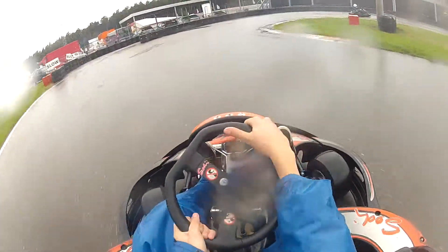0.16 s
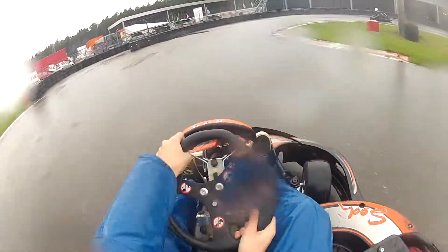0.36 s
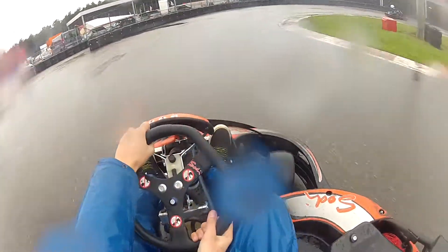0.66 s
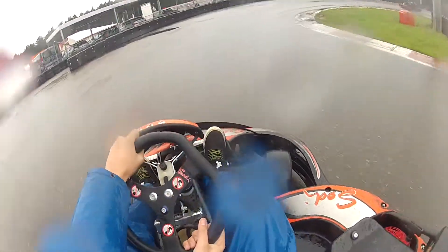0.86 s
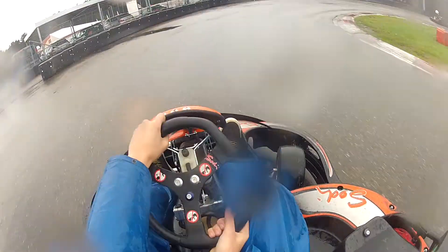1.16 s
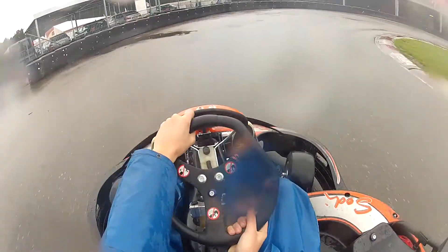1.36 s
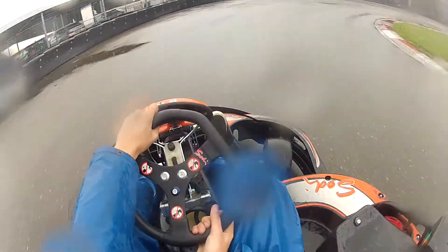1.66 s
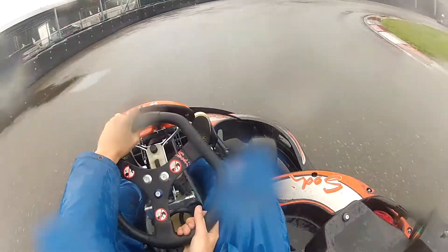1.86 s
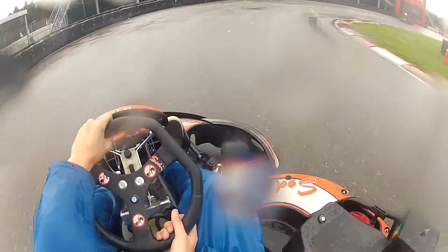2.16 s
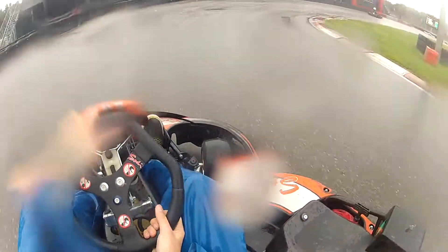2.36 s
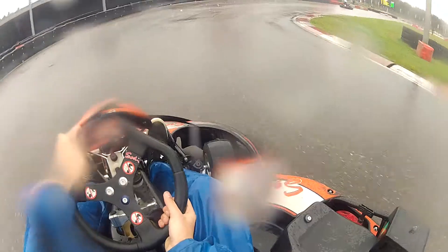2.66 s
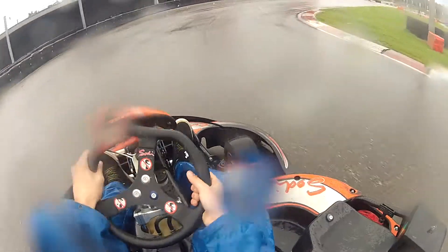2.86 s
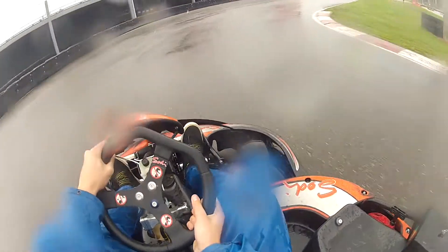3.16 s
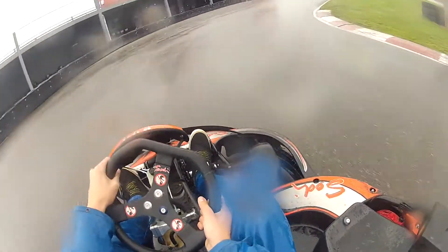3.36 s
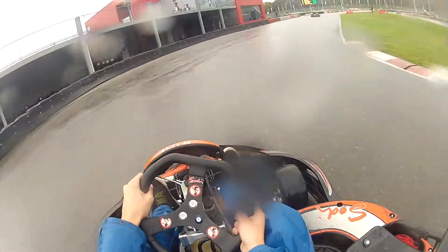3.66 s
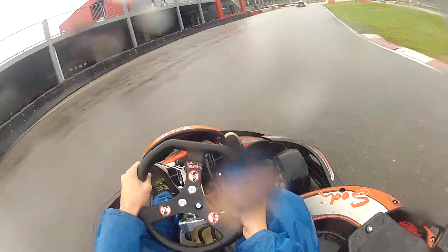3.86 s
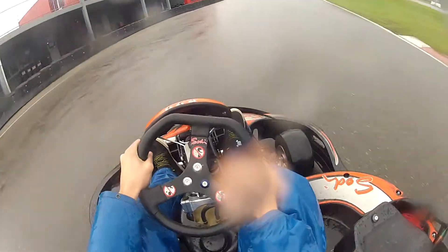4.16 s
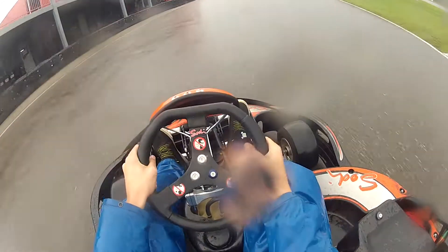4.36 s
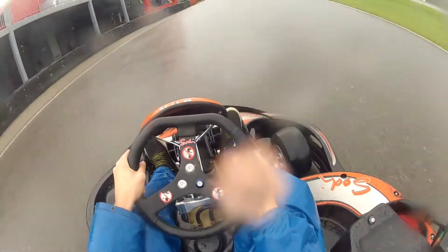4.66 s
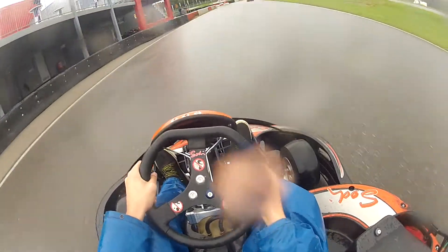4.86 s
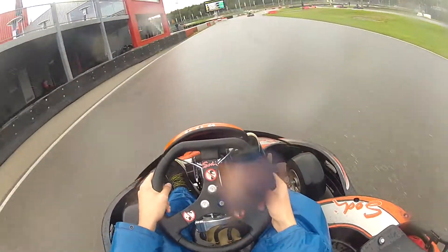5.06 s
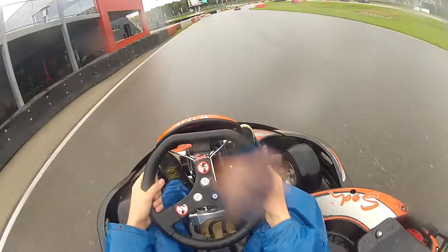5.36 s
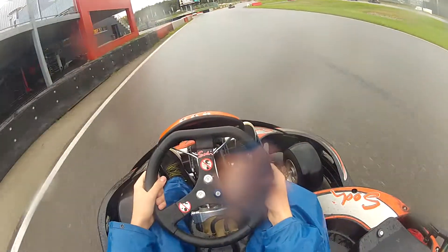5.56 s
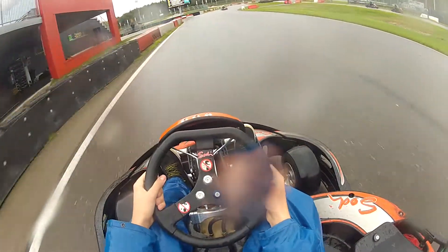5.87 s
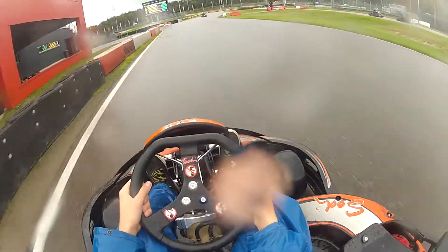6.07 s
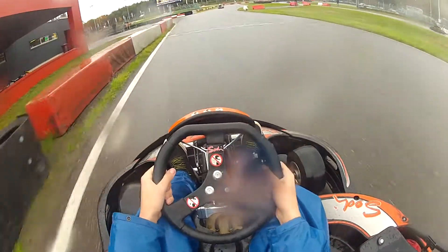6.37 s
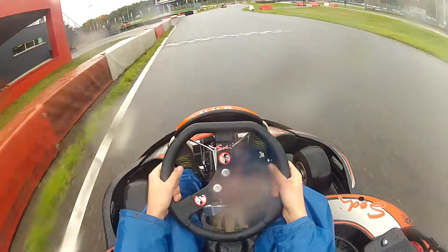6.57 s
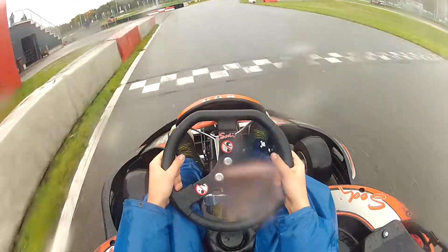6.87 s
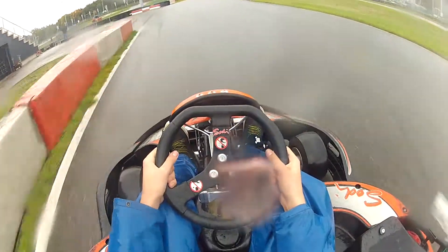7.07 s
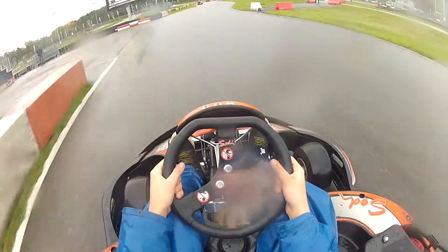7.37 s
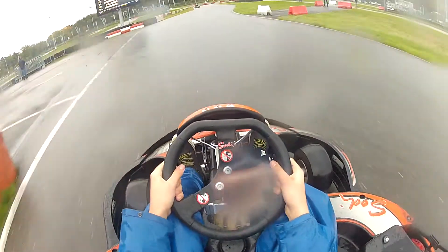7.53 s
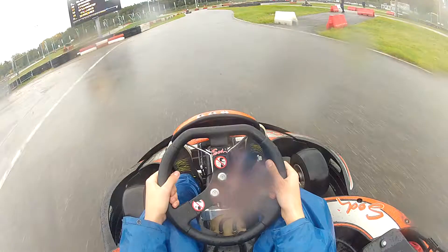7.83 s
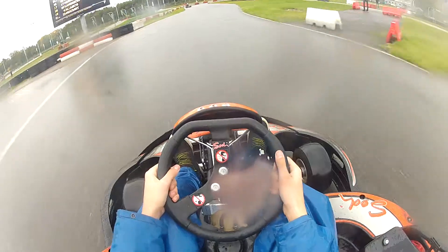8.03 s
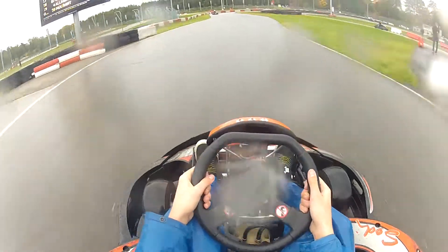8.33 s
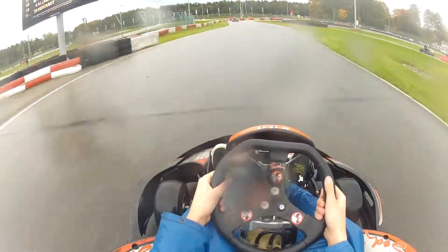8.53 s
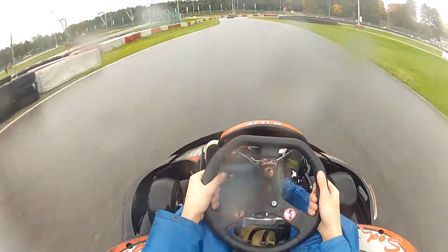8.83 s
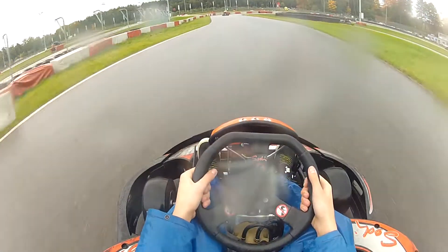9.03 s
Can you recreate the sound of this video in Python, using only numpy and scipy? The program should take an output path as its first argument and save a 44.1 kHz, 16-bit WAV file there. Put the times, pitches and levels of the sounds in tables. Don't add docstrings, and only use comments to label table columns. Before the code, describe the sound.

Heard from a sealed camera on the driver's helmet, a small four-stroke kart engine growls briefly, falls to a slow idle in a corner, then revs back into a buzzy, steady drone. Metallic clutch clinks tick through the pickup. Later the pitch climbs with a thin chain whine, tyres hiss faintly on the wet track, and bumps knock the housing hard.

```python
import sys
import numpy as np
from scipy import signal
from scipy.fft import rfft, irfft, next_fast_len
from scipy.io import wavfile
from scipy.ndimage import uniform_filter1d

SR = 44100
rng = np.random.default_rng(int(sys.argv[2]) if len(sys.argv) > 2 else 0)


def store_pcm(level_fs):
    pcm = np.round(np.clip(level_fs, -1, 1) * 32767).astype(np.int16)
    wavfile.write(sys.argv[1], SR, np.atleast_2d(pcm).T)


def voltage_ratio(decibels):
    exponent = np.asarray(decibels, float) / 20
    return 10 ** exponent


N = 405719


def rms_one(x):
    return x / np.sqrt(np.mean(x ** 2) + 1e-20)


def in_time(rows):
    s, *columns = np.transpose(rows)
    return [np.interp(np.arange(N) / SR, s, c) for c in columns]


def at_hz(points, hz):
    point_hz, value = np.transpose(points)
    return np.interp(np.log(hz), np.log(point_hz), value)


def drift(rate_hz):
    r = np.exp(-80 * np.pi * rate_hz / SR)
    slow = signal.lfilter([1], [1, -2 * r, r * r], rng.standard_normal(N // 40 + 2002))[2000:]
    return np.interp(np.arange(N) / 40, np.arange(len(slow)), rms_one(slow))


def coloured(spectrum):
    size = next_fast_len(N)
    hz = np.maximum(np.fft.rfftfreq(size, 1 / SR), 1)
    white = rfft(rng.standard_normal(size))
    return rms_one(irfft(white * voltage_ratio(at_hz(spectrum, hz)), size)[:N])


def resonance(x, hz, width_hz):
    r = np.exp(-np.pi * width_hz / SR)
    poles = [1, -2 * r * np.cos(2 * np.pi * hz / SR), r * r]
    return signal.lfilter([(1 - r * r) / 2, 0, (r * r - 1) / 2], poles, x)


def struck(times_s, peaks_db, hz, level_db, t60_s):
    clicks = np.full(N, 1e-18)
    clicks[(np.asarray(times_s) * SR).astype(int)] = voltage_ratio(peaks_db + level_db)
    r, w = voltage_ratio(-60 / (t60_s * SR)), 2 * np.pi * hz / SR
    return signal.lfilter([0, np.sin(w)], [1, -2 * r * np.cos(w), r * r], clicks)


def crack(times_s, peaks_db, t60_s):
    touch = np.full(N, 1e-18)
    touch[(times_s * SR).astype(int)] = voltage_ratio(peaks_db)
    envelope = signal.lfilter([1], [1, -voltage_ratio(-60 / (t60_s * SR))], touch)
    return envelope * coloured([(700, -40), (1300, 9), (3700, 21.5), (5900, -78), (7000, -68)])


def per_cycle(cycles, spread_db):
    return voltage_ratio(spread_db * rng.standard_normal(400)[cycles.astype(int)])


def follow(law, controls_db):
    return law[0] + sum(share * c for share, c in zip(law[1:], controls_db))


def exhaust_note(rate_hz, cycles, note_db):
    # multiple of firing rate, level/dB
    orders = [(1, -24), (2, -19), (3, -0.5), (4, -40), (5, -15.5), (6, -7), (7, -8.5), (8, -20), (9, -6),
              (10, -24), (11, -3.5), (12, -25), (13, -10), (14, -0.5), (15, -6), (16, -1.5), (17, 0.5),
              (18, -5), (19, -4), (20, 0.5), (21, -15), (22, -2), (23, -17), (24, -3.5), (25, -2),
              (26, -3.5), (27, -6.5), (28, -42), (29, -25), (30, -21)]
    # f/Hz, gain/dB
    silencer = [(25, -2), (60, 2.5), (100, 0.5), (200, -0.5), (300, 3.5), (400, -3.5), (485, -9.5),
                (555, -1), (620, -11), (690, -15), (800, -9.5), (950, -13)]
    # centre t/s, length/s, gain/dB
    slack_s, slack_length_s, slack_depth_db = (5.44, .42, -18)
    step = 8
    t = np.arange(0, N, step) / SR
    slack_db = slack_depth_db * np.exp(-((t - slack_s) / slack_length_s) ** 4)
    out = 0
    for order, level_db in orders:
        wander_db = 0.56 * drift(2.8)[::step] + slack_db * (order < 5)
        phase = 2 * np.pi * order * cycles[::step] + np.pi / 2 * (order % 2)
        phase = phase + .5 * rng.standard_normal() + 0.39 * drift(1.6)[::step]
        colour_db = at_hz(silencer, order * rate_hz[::step])
        out += voltage_ratio(level_db + colour_db + wander_db) * np.cos(phase)
    return -voltage_ratio(note_db + 5.0) * rms_one(signal.resample_poly(out, step, 1)[:N])


def rough_exhaust(cycles, rough_db):
    # f/Hz, density/dB per Hz
    spectrum = [(53, -31), (90, 10.5), (113, -14), (306, 2.5), (371, -15), (405, -2.5), (610, -7),
                (825, -22), (900, -29), (1170, -23), (1980, -120)]
    puff = .5 + np.exp(-3.0 * (2 * cycles % 1))
    return voltage_ratio(rough_db) * rms_one(coloured(spectrum) * puff * per_cycle(2 * cycles % 400, 1.05))


def pops(cycles, pop_db):
    # f/Hz, level/dB, t60/s
    port = [(315, 0, .024), (520, -6, .01)]
    at = np.flatnonzero(np.diff(np.floor(2 * cycles)))
    weak = np.floor(2 * cycles[at + 1]) % 2 == 0
    strength_db = pop_db[at] + 3 - 6.0 * weak + .8 * rng.standard_normal(800)[:len(at)]
    return -sum(struck(at / SR, strength_db, *mode) for mode in port)


def mechanical_hiss(cycles, hiss_db, steady):
    # f/Hz, density/dB per Hz
    spectrum = [(380, -36), (650, -9), (812, -13), (924, -5.5), (1640, -8.5), (2070, -2), (3030, -14),
                (3710, -12), (5470, -20.5), (5950, -25.5), (7740, -49), (13100, -120)]
    # f/Hz, width/Hz, level over hiss/dB
    housing = [(1017, 125, 6), (1342, 67, 2.5), (1777, 29, 8.5), (2037, 88, 5), (2457, 255, 5.5),
               (2650, 50, -15), (3610, 110, 9), (5320, 150, 5)]
    burst = np.exp(-3 * ((cycles + .05) % 1)) + .3 * np.exp(-5 * ((cycles + .55) % 1))
    burst = uniform_filter1d(burst * per_cycle(cycles + 0.062, 0.15), size=240)
    noise = coloured(spectrum) * (steady + burst) * voltage_ratio(.8 * drift(90.0))
    rattle = coloured(spectrum) * (steady / 5 + burst) * voltage_ratio(drift(90.0))
    rings = sum(voltage_ratio(db + 2.4 * drift(18.5)) * resonance(rattle, hz, width) for hz, width, db in housing)
    return voltage_ratio(hiss_db) * rms_one(0.9 * noise + rings)


def spray(cycles):
    # f/Hz, density/dB per Hz
    spectrum = [(1470, -35), (2500, 2), (2910, -43), (3190, -13), (3330, 4.5), (3770, 4), (3950, -9),
                (5900, -14), (7670, -56), (13000, -120)]
    level_db = -50.5
    stir = 1 + 0.2 * np.cos(4 * np.pi * cycles)
    return voltage_ratio(level_db) * coloured(spectrum) * stir * voltage_ratio(1.0 * drift(21.0))


def chain(cycles, tooth_hz, road_db, locked):
    # f/Hz, width/Hz, level/dB
    guard = [(610, 84, -34), (800, 310, -45), (1070, 53, -23.5), (1510, 71, -29), (1730, 75, -36.5)]
    growth_per_db, lock_gain_db = 2.8, 7
    overtone_db, half_tooth_db = -7, -48

    def swell(multiple):
        return sum(voltage_ratio(db) / (1 + (2 * (multiple * tooth_hz - hz) / width) ** 2) for hz, width, db in guard)

    phase = 2 * np.pi * np.cumsum(tooth_hz) / SR + .3 * drift(5)
    tug = np.sqrt(2) * (1 + 0.71 * np.cos(2 * np.pi * cycles))
    whine_flutter_db, overtone_flutter_db = 1.5 * drift(4), 2.5 * drift(6)
    growth = voltage_ratio(growth_per_db * (road_db - 7.5) + lock_gain_db * locked)
    links = locked * voltage_ratio(half_tooth_db + whine_flutter_db) * np.sin(phase / 2)
    whine = swell(1) * voltage_ratio(whine_flutter_db) * np.sin(phase)
    overtone = swell(2) * voltage_ratio(overtone_db + overtone_flutter_db) * np.sin(2 * phase)
    return links + tug * growth * (whine + overtone)


def shaking(controls_db):
    # t/s, peak/dB, length/s, upper modes relative/dB
    patches = [(0.422, -31.5, 0.11, -34), (0.71, -41, 0.17, -12), (2.87, -39, 0.32, -7),
               (3.404, -29.5, 0.1, -27), (3.822, -21, 0.012, -20), (4.123, -35, 0.035, -13),
               (4.407, -23, 0.031, -17), (4.59, -40, 0.024, -1), (4.897, -35.5, 0.041, -10.5),
               (5.3, -35, 0.18, -12), (5.614, -39, 0.023, -1), (5.79, -26.5, 0.043, -13),
               (6.33, -62, 0.015, -15), (6.457, -42, 0.023, -15), (6.642, -28, 0.079, -15),
               (6.892, -38, 0.023, -19), (7.092, -23.5, 0.065, -4), (7.462, -32, 0.026, 0),
               (7.612, -31.5, 0.14, -4), (7.852, -22, 0.028, -27), (7.984, -23, 0.11, -15),
               (8.294, -45, .03, 6), (8.395, -25, 0.15, -5.5), (8.838, -13, 0.048, -1),
               (9.14, -24, 0.059, -27)]
    # f/Hz, width/Hz, level/dB
    low_modes = [(50.8, 3.15, -1), (80.8, 7, -4.5)]
    high_modes = [(127, 53, -8), (156, 42, 18), (185.2, 23.5, 11), (270.3, 36, 14.5)]
    # base/dB, then dB per dB of load, crank speed, road speed
    low_law = (-41, -0.2, 2, 1.87)
    high_law = (-42.5, -0.1, 1, 1.8)
    s, low_db, length_s, upper_db = np.transpose(patches)
    t = np.arange(0, N, 40) / SR
    swells = np.exp(-((t[:, None] - s) / length_s) ** 2)
    out = 0
    for law, patch_db, modes in ((low_law, low_db, low_modes), (high_law, low_db + upper_db, high_modes)):
        level = voltage_ratio(follow(law, controls_db)) + np.interp(np.arange(N) / SR, t, swells @ voltage_ratio(patch_db))
        road = rng.standard_normal(N) * voltage_ratio(1.1 * drift(10.0))
        rings = 0
        for hz, width, db in modes:
            ring = resonance(resonance(road, hz, 2 * width), hz, 2 * width)
            rings = rings + voltage_ratio(db) * ring / np.sqrt(width)
        out = out + level * rms_one(rings)
    return out


def clinks():
    # t/s, peak/dB, bright part relative/dB
    contacts = [(0.761, -33, -14), (0.8565, -38, -12), (1.9988, -48, 8), (2.1187, -30, -5),
                (2.203, -31.5, -2), (2.2682, -49, -5), (2.2914, -30, -12), (2.358, -31, -16),
                (2.595, -25, -1), (3.0087, -29, -1), (3.509, -29, 4), (3.6926, -19, -9), (5.1074, -38, 0),
                (6.1124, -32, -7)]
    s, peak_db, bright_db = np.transpose(contacts)
    dull = struck(s, peak_db, 1140, -1.7, 0.014) + struck(s, peak_db, 1310, -8, 0.027)
    return dull + crack(s, peak_db + bright_db - 2.5, 0.061)


def mount():
    # t/s, snap peak/dB, body ring relative/dB
    knocks = [(6.579, -32, -9), (6.897, -24, 12), (7.027, -25, 3), (7.077, -7, 1), (7.851, -21, 8),
              (7.945, -10, 3), (8.016, -14, 3.5), (8.076, -15.5, 7), (8.267, -5, 0), (8.328, -29, 13),
              (8.349, -8, 2), (8.486, -16, 4.5), (8.625, -4, -5), (8.807, -1.5, -8), (8.828, -7, -11),
              (8.848, -2.5, 1), (8.867, -8, -1), (8.904, -12.5, 2.5)]
    # t/s, peak/dB
    bumps = [
        (7.005, -22),
        (7.137, -32),
        (7.306, -20),
        (7.36, -19),
        (7.446, -16.5),
        (7.653, -12),
        (7.743, -14.5),
        (8.551, -13),
        (9.006, -18.5),
        (9.156, -20),
    ]
    # f/Hz, level/dB, t60/s
    snap = [(672, 4, .018), (1056, -7.5, 0.014), (1350, -20.5, 0.018), (1970, -19, 0.03)]
    tick = [(1250, -14, .008), (2050, -15, .008), (2900, -22, .006)]
    body = (274.7, 0, 0.11)
    thump = (150, 4, .016)
    s, peak_db, body_db = np.transpose(knocks)
    out = -sum(struck(s + .001, peak_db, *mode) for mode in snap)
    out += struck(s + .003, peak_db + body_db, *body)
    out += struck(s + .002, peak_db - 8, *thump)
    out += crack(s - .001, peak_db - 24, .012)
    out -= sum(struck(s - .0012, peak_db, *mode) for mode in tick)
    return out + struck(*np.transpose(bumps), *body)


def scene():
    # t/s, firing rate/Hz
    speed = [(0, 23.0), (.2, 25.4), (.33, 26.6), (.42, 27.0), (.6, 24.5), (1.1, 14.5), (1.6, 13.6),
             (2.1, 14), (2.3, 18), (2.46, 22), (2.61, 24.7), (2.79, 26.4), (3.25, 27.2), (3.43, 27.0),
             (4.0, 27.8), (4.38, 27.9), (7.05, 27.9), (9.2, 28)]
    # t/s, f/Hz
    teeth = [
        (0, 390),
        (3.6, 400),
        (4.2, 460),
        (5.3, 587),
        (6, 668),
        (7, 758),
        (7.3, 797),
        (8.3, 879),
        (8.8, 917),
        (9.2, 941),
    ]
    # t/s, level re full load/dB
    load = [(0, -7), (.12, -0.5), (.36, 4.5), (.44, -16), (.58, -26), (.7, -35), (.9, -36), (1.05, -30),
            (2.15, -29), (2.3, -24), (2.5, -4.5), (2.8, -2), (3.1, 1.5), (9.2, -1.5)]
    # base/dB, then dB per dB of load, crank speed, road speed
    note_law = (-34, 0.43, 1.54, 0.2)
    rough_law = (-39.5, .28, -0.1, -0.4)
    pop_law = (-28.5, 0.3, 2.8, -2.8)
    hiss_law = (-32.5, 0.36, 0.5, 0.1966)
    # base/1, then 1 per dB of the same controls
    steady_law = (.55, -.012, 0, .07)
    teeth_per_cycle = 28
    (slip_hz,), (tooth_hz,), (load_db,) = in_time(speed), in_time(teeth), in_time(load)
    locked_hz = tooth_hz / teeth_per_cycle
    rate_hz = np.maximum(slip_hz, locked_hz)
    cycles = np.cumsum(rate_hz) / SR + .47
    road_db = 20 * np.log10(tooth_hz / 400)
    controls_db = load_db, 20 * np.log10(rate_hz / 27.9), road_db
    locked = np.clip(30 * (locked_hz / slip_hz - .97), 0, 1)

    engine = exhaust_note(rate_hz, cycles, follow(note_law, controls_db))
    engine += rough_exhaust(cycles, follow(rough_law, controls_db))
    engine += pops(cycles, follow(pop_law, controls_db))
    engine += mechanical_hiss(cycles, follow(hiss_law, controls_db), follow(steady_law, controls_db))
    kart = engine + spray(cycles) + chain(cycles, tooth_hz, road_db, locked)
    return (kart + shaking(controls_db) + clinks() + mount())[None]


def duck(x):
    from_db, share, recover_db_per_s, attack_s = -3, 1.5, 48, .012
    climb_db = recover_db_per_s * np.arange(N) / SR
    held_db = np.maximum.accumulate(20 * np.log10(np.abs(x) + 1e-9) + climb_db, axis=1) - climb_db
    r = np.exp(-1 / (attack_s * SR))
    return x * voltage_ratio(-share * signal.lfilter([1 - r], [1, -r], np.maximum(held_db - from_db, 0)))


def drop_faint(x, share):
    hz, _, cells = signal.stft(x, SR, nperseg=2048)
    power = uniform_filter1d(np.abs(cells) ** 2, size=4, axis=0)
    level_db = 10 * np.log10(uniform_filter1d(power, size=2, axis=1) + 1e-20)
    treble = (hz > 4500) & (hz < 15300)
    margin_db = level_db - .95 * level_db[treble].mean(axis=0) - 3 * (hz[:, None] > 10200)
    faint = treble[:, None] & (margin_db < np.quantile(margin_db[treble], share))
    return signal.istft(cells * ~faint, SR, nperseg=2048)[1][:N]


def roll_off(x):
    return signal.sosfilt(signal.butter(12, 15860, fs=SR, output="sos"), x)


def record(dry):
    low_rate_hz, cutoff_hz, top = 12000, 15000, .74
    up, down = low_rate_hz // 300, SR // 300
    sparse = signal.resample_poly(duck(dry), up, down, axis=1)
    limited = sparse / (1 + (sparse / top) ** 4) ** .25
    held = signal.resample_poly(np.repeat(limited, 4, axis=1), down, 4 * up, axis=1)
    low_pass = signal.ellip(10, .5, 60, cutoff_hz, fs=SR, output="sos")
    cut = signal.sosfilt(low_pass, held[0, :N])
    mix = drop_faint(cut, .15)[None]
    return roll_off(mix)


dry = scene()
out = record(dry)
store_pcm(out)
```